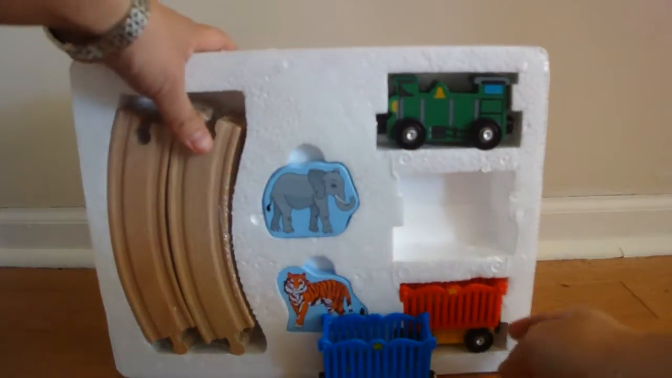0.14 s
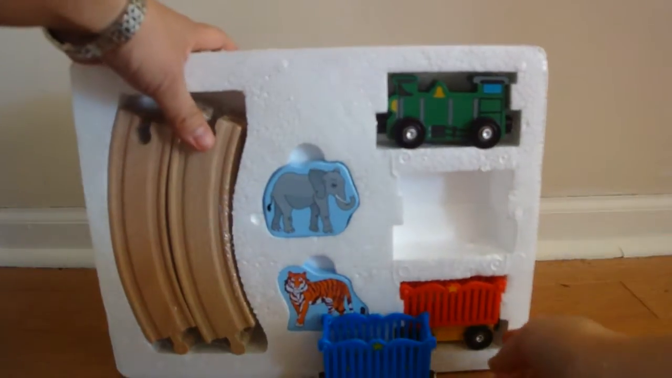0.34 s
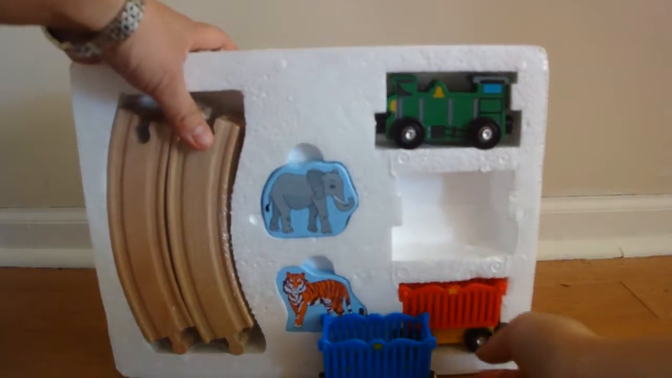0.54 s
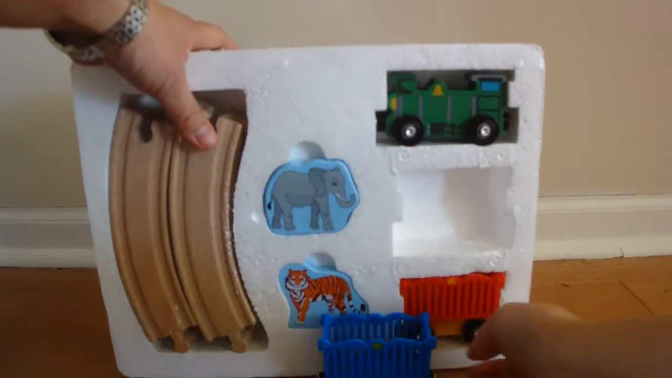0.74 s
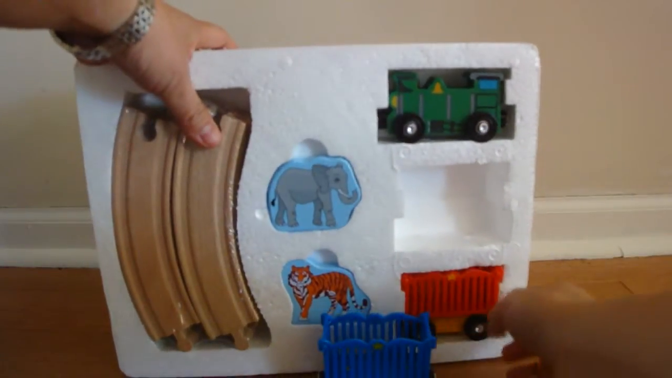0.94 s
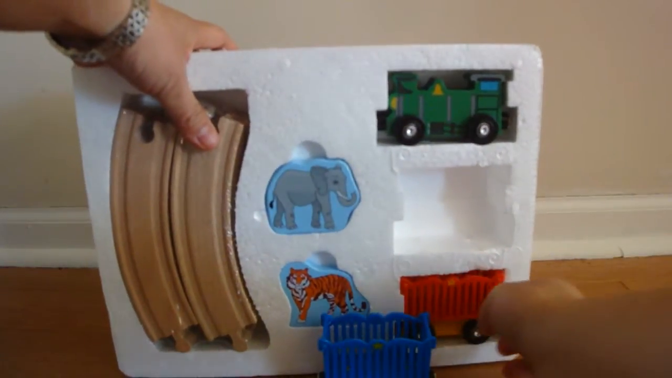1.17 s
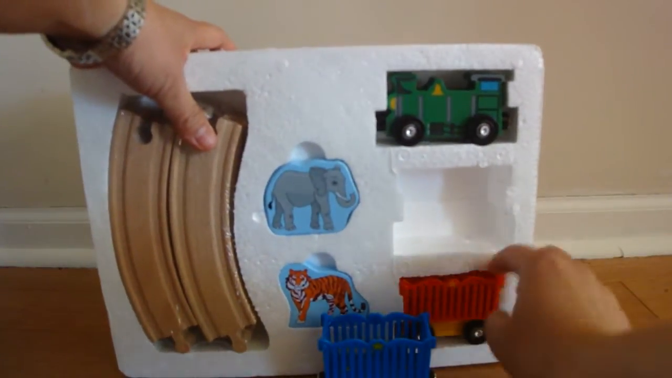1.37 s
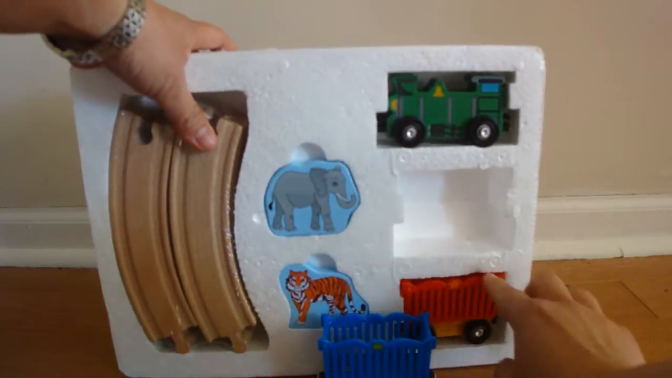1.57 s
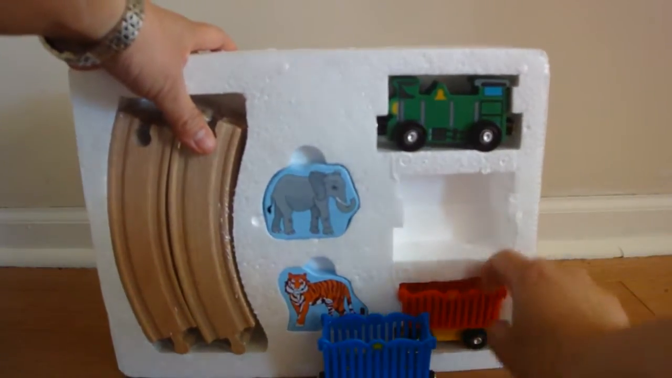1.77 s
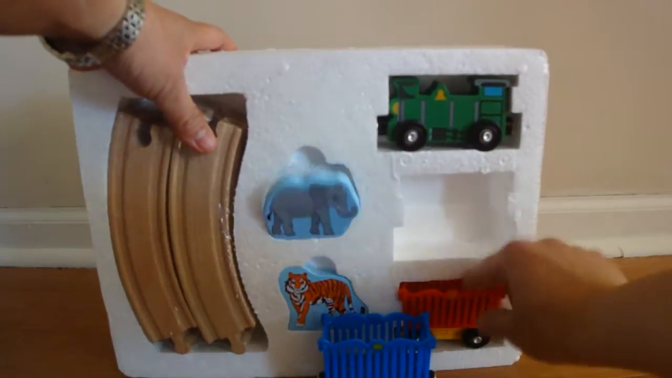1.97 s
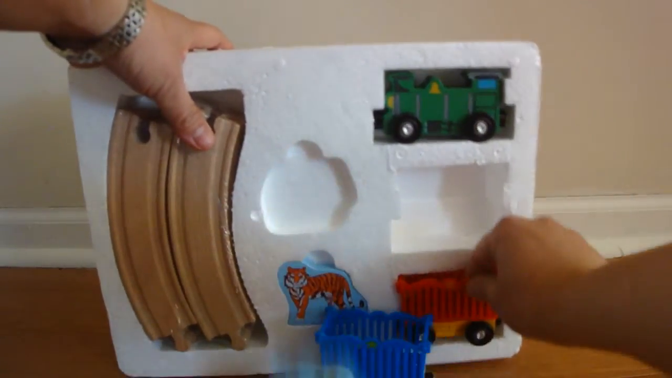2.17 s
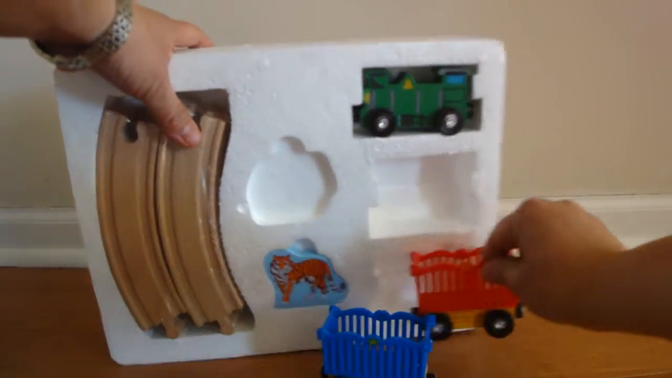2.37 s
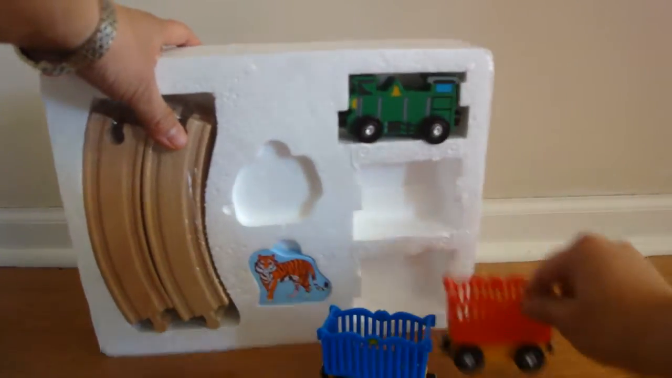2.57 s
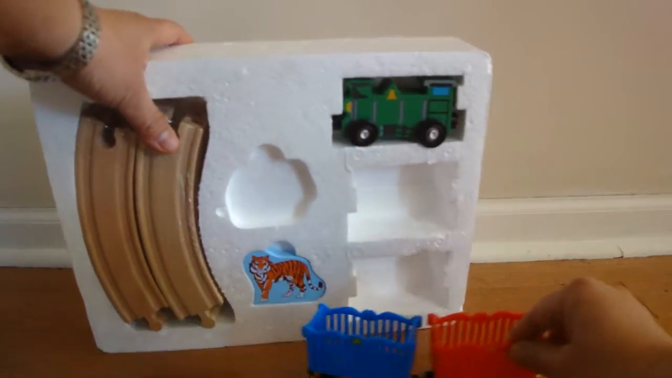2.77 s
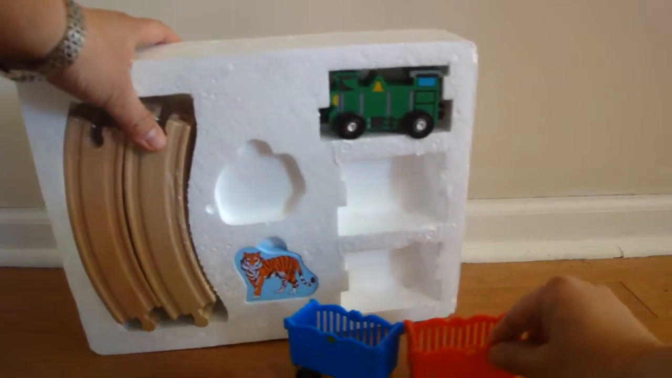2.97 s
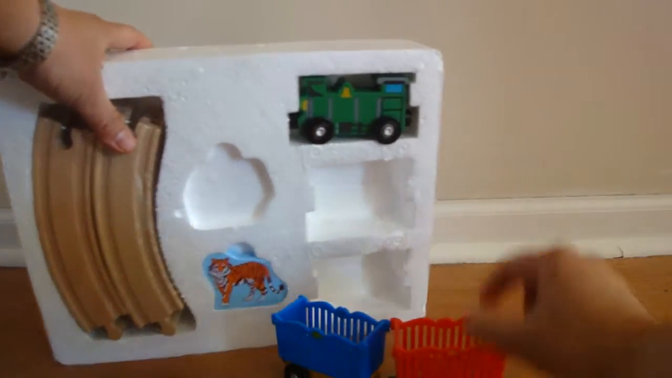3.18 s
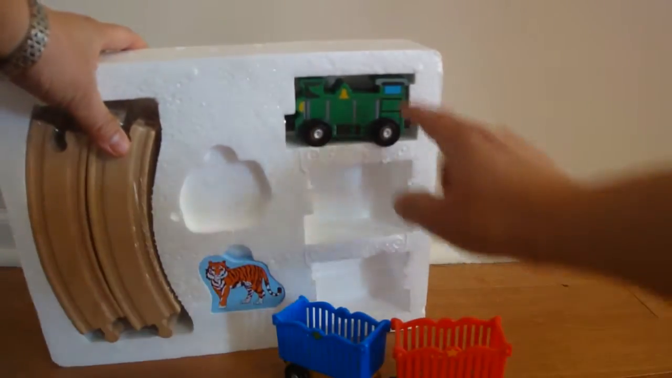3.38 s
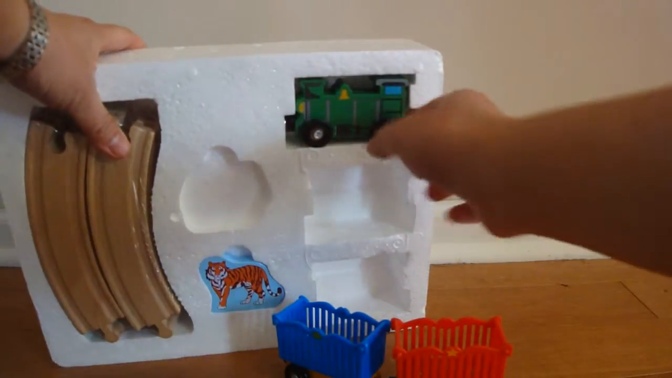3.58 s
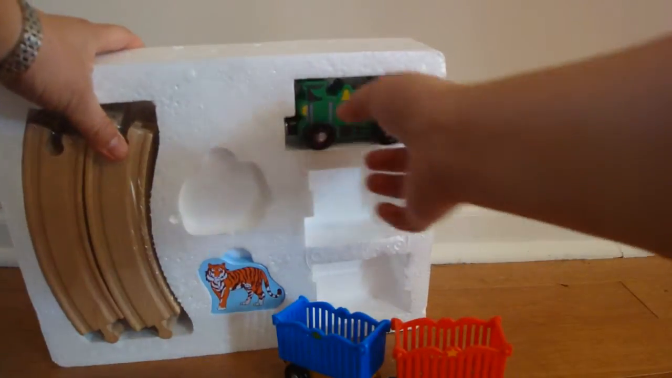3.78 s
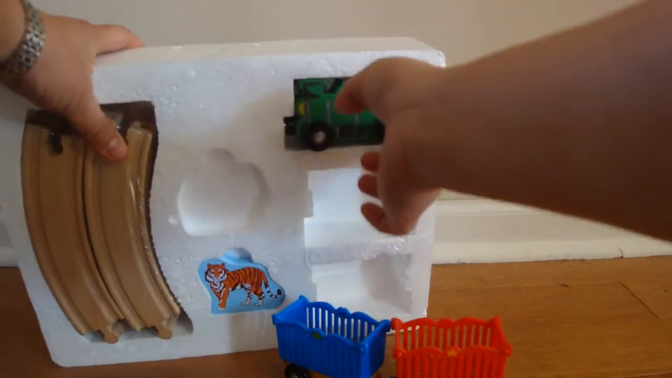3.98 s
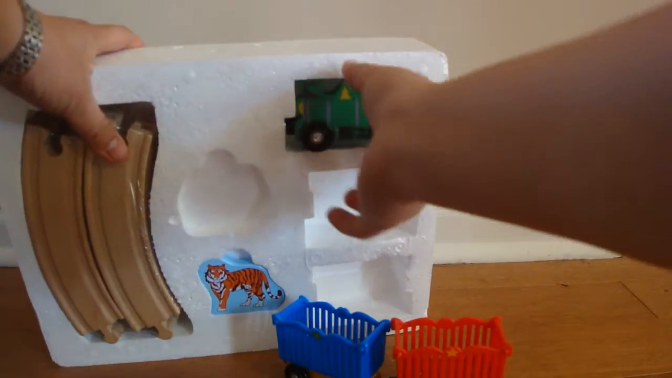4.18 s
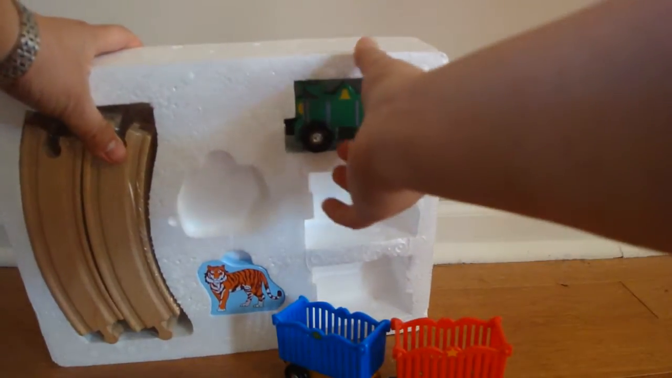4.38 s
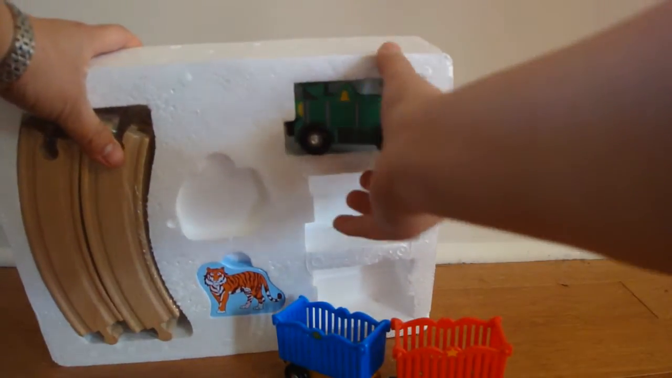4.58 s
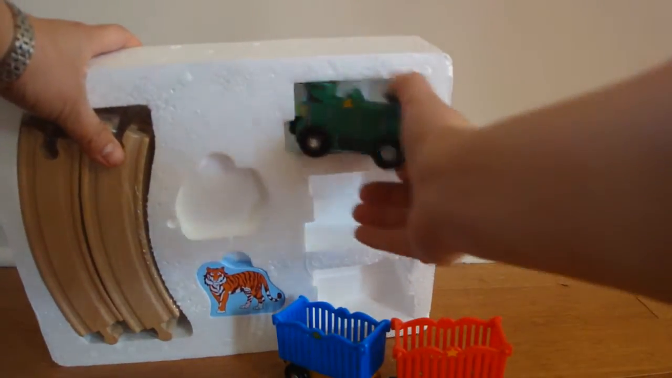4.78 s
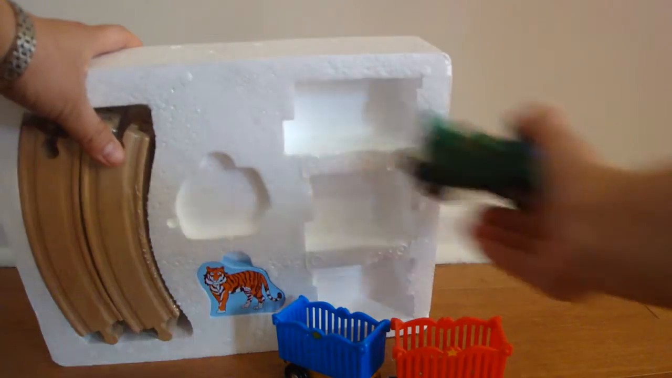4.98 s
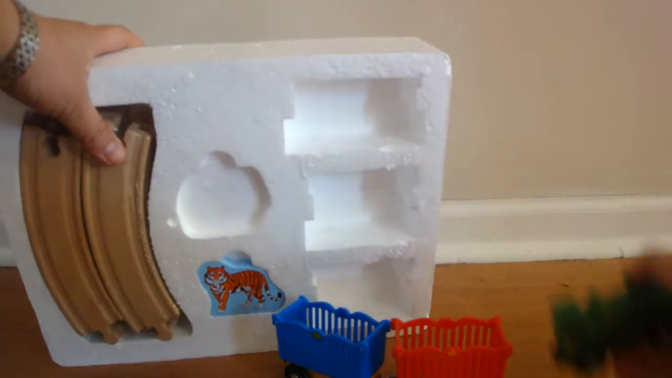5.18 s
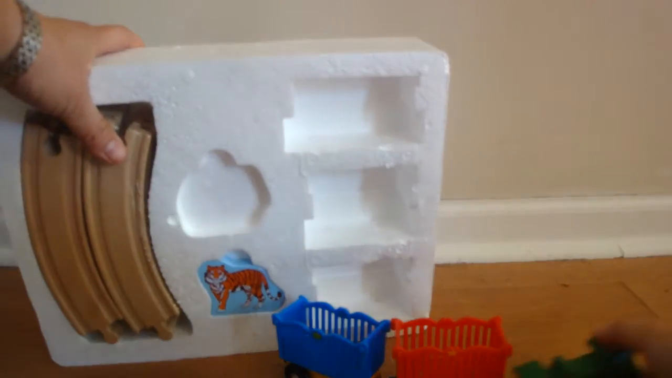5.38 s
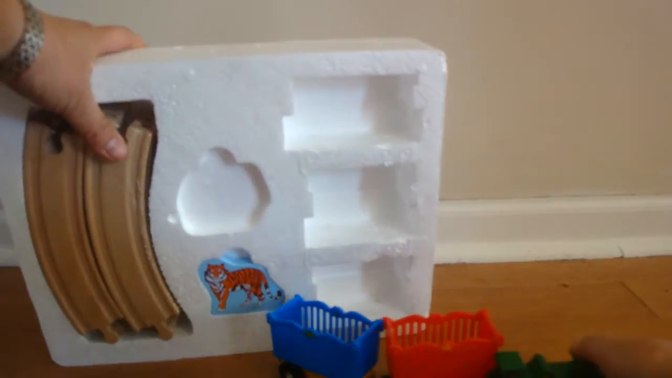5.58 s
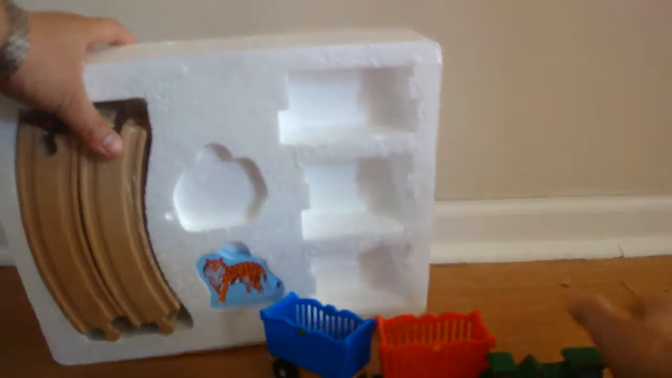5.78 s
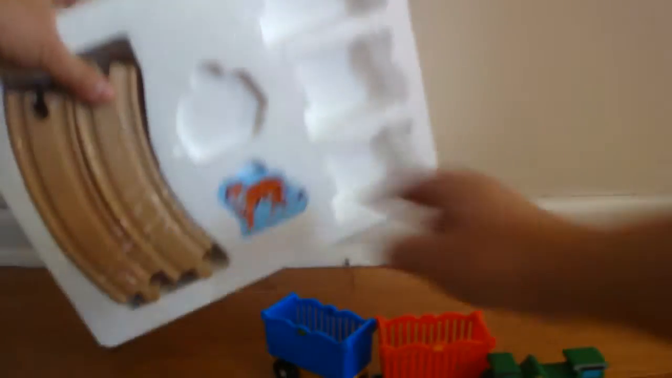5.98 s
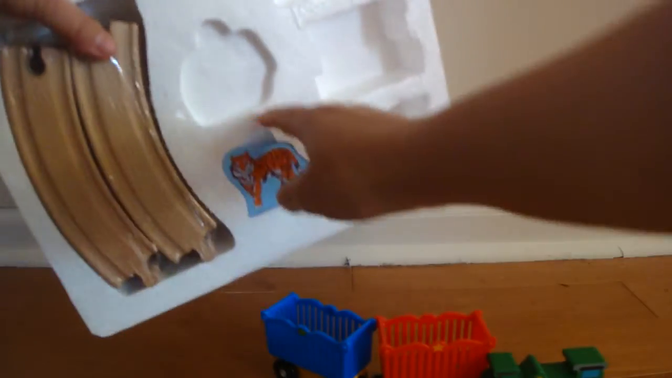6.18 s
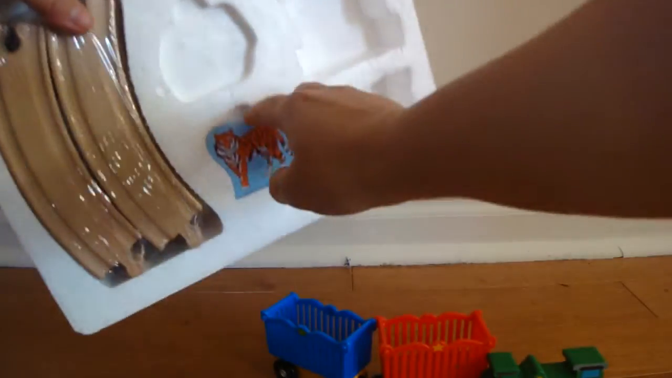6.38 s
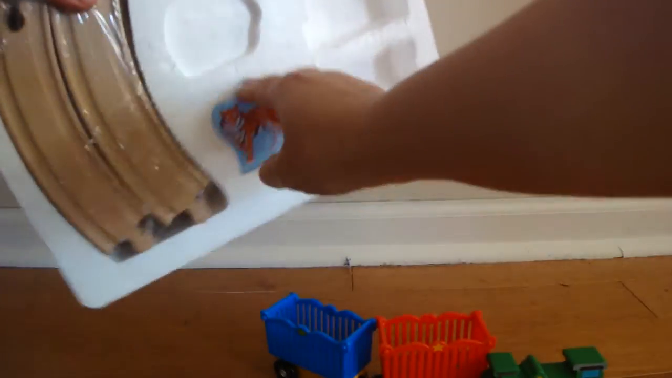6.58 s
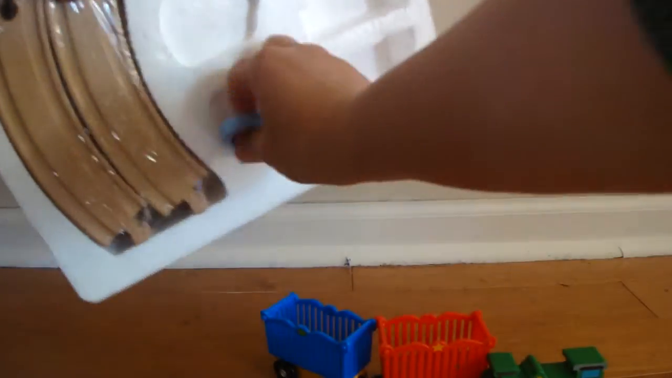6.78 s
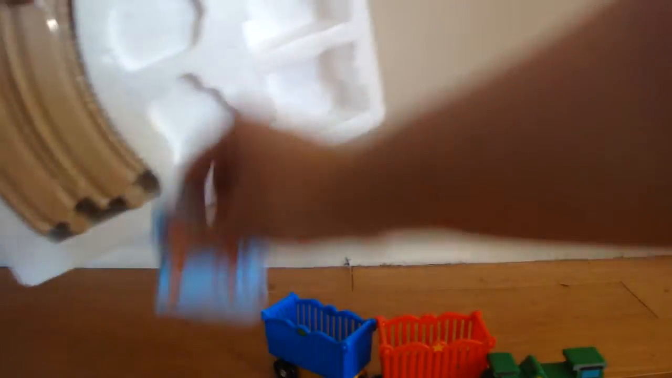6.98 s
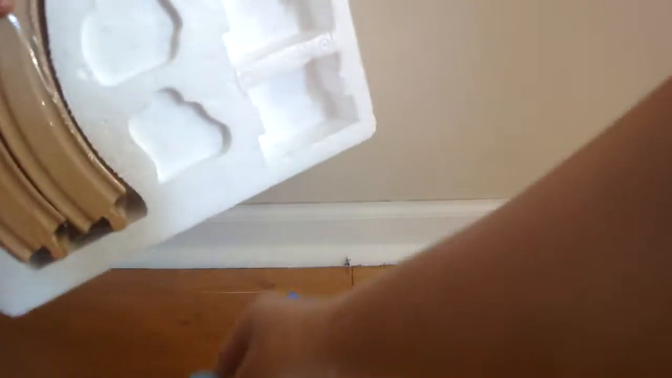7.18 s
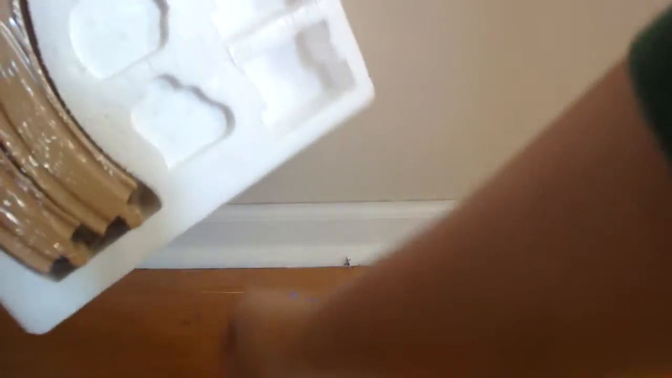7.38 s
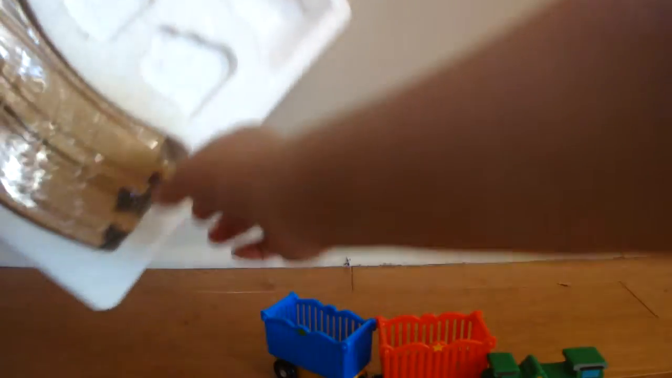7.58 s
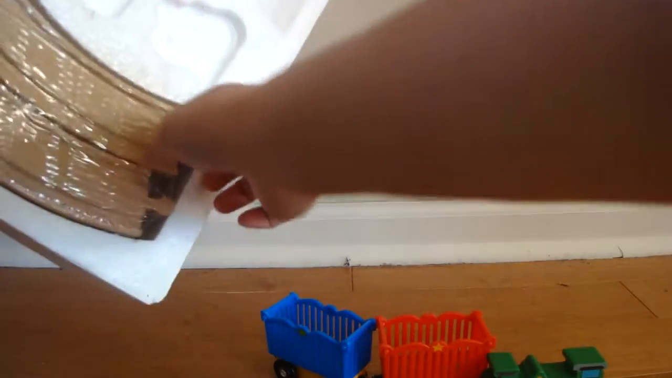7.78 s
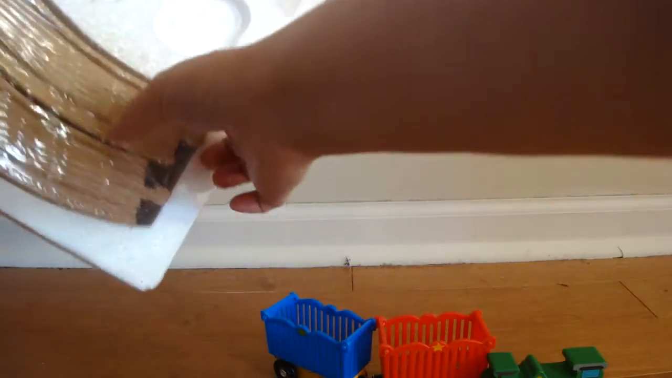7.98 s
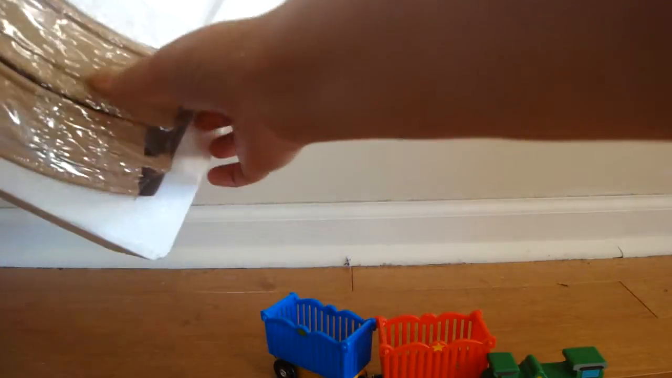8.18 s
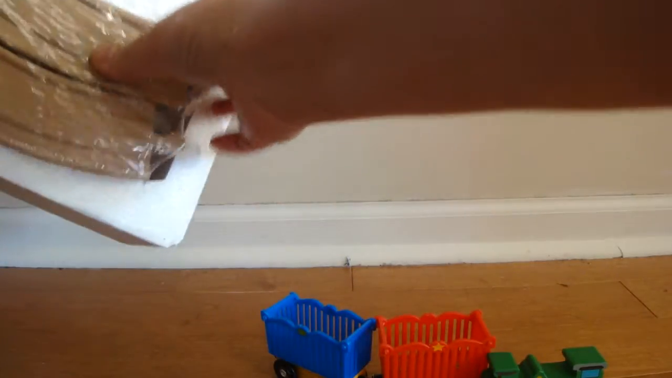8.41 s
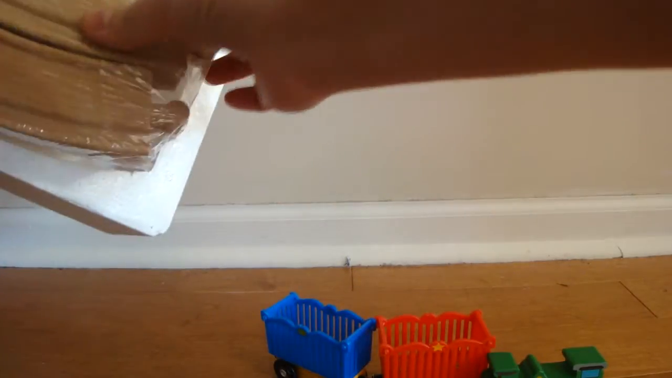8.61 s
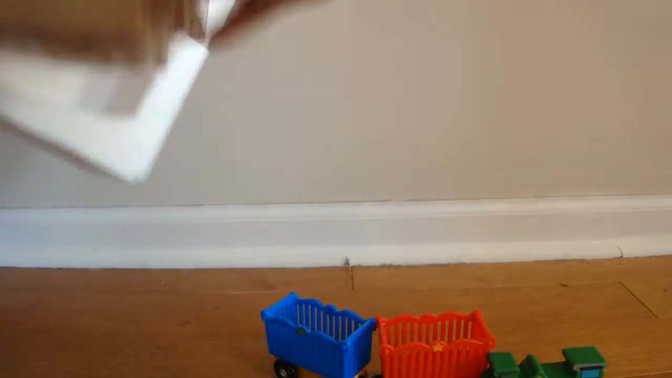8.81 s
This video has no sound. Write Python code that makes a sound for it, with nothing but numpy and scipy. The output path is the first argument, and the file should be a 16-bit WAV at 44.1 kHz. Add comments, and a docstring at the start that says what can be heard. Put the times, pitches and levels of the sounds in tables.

```python
"""Toys worked out of a foam tray

In a bare room, hands ease toy wagons and wooden animals from a foam tray close to a phone. Friction makes the
foam rasp and scuff, stick-slip makes it and a plastic wrap squeak, and fingers tap it. Impacts excite the modes
of toy and floor: a wooden animal falls and rocks to rest on the boards, an engine is set down, and a second
animal drops into a plastic wagon. The phone ducks its gain after loud blows."""
import sys
import numpy as np
from scipy import signal
from scipy.fft import rfft, irfft, next_fast_len
from scipy.io import wavfile
from scipy.ndimage import uniform_filter1d, map_coordinates

SR = 44100
rng = np.random.default_rng(int(sys.argv[2]) if len(sys.argv) > 2 else 0)


def generate_wav(sig):
    """Save sig (samples, or channels by samples) to the path in sys.argv[1] as 16-bit PCM at SR."""
    pcm = np.round(np.clip(np.atleast_2d(sig).T, -1, 1) * 32767).astype(np.int16)
    wavfile.write(sys.argv[1], SR, pcm)


N = 390285

# modes of the floor boards: (frequency [Hz], level [dB], t60 [s])
FLOOR_MODES = [(324.7, -19, 0.034), (423, -8.5, 0.041), (488.5, -0.5, 0.019), (730, -17, 0.0055)]


def amp(db):
    return 10 ** (np.asarray(db) / 20)


def unit(x):
    return x / np.sqrt(np.mean(x ** 2) + 1e-20)


def along(points, hz):
    """Interpolation of (frequency [Hz], value) points on a logarithmic frequency axis."""
    f, v = np.transpose(points)
    return np.interp(np.log(hz + 1), np.log(f + 1), v)


def filtered(x, response):
    """Linear filtering: the spectrum of x times a complex frequency response."""
    m = next_fast_len(len(x) + 8192)
    return irfft(rfft(x, m) * response(np.fft.rfftfreq(m, 1 / SR)), m)[:len(x)]


def resonance(f, hz, width):
    """Response of a damped oscillator, with gain 1 at its natural frequency."""
    return 1j * f * width / (hz * hz - f * f + 1j * f * width)


def resonate(x, bands):
    """Superposition: x drives parallel resonances of alternating polarity."""
    return filtered(x, lambda f: sum((-1) ** k * amp(db) * resonance(f, hz, width)
                                     for k, (hz, width, db) in enumerate(bands)))


def wobble(rate):
    """A smooth random curve with rate knots a second."""
    return map_coordinates(rng.standard_normal(int(N * rate / SR) + 4), [np.arange(N) * rate / SR])


def add(out, start_s, sound):
    part = out[round(start_s * SR):][:len(sound)]
    part += sound[:len(part)]


def background():
    """Noise floor: room and microphone hiss, with a faint treble tick once a mains cycle."""
    # hiss spectrum: (frequency [Hz], relative density [dB])
    spectrum = [(15, -47), (25, -9.5), (118, -9), (191, -4.5), (216, -7), (309, 0.5), (342, -6),
                (526, -2.5), (645, -4.5), (831, -5), (1280, -6.5), (2960, -12), (10800, -17), (14000, -53),
                (22000, -120)]
    mains_hz = 60
    hiss = unit(filtered(rng.standard_normal(N), lambda f: amp(along(spectrum, f))))
    gate = amp(-60 * (np.arange(N) / SR % (1 / mains_hz)) / 0.0015)
    tick = filtered(gate * rng.standard_normal(N), lambda f: resonance(f, 11300, 6000))
    return amp(-56 + 0.15 * wobble(3.8)) * (hiss + amp(-5.5) * unit(tick))


def room(x):
    """Reverberation: each frequency decays at its own rate; the tail changes as hands and tray move."""
    # reverberation time: (frequency [Hz], t60 [s])
    decay = [(200, 0.53), (1000, 0.48), (4000, 0.4), (10000, 0.32)]
    out, step = np.zeros(N), SR // 12
    x = filtered(x, lambda f: 1j * f / (1j * f + 344))  # small toys radiate little bass
    for start in range(0, N, step):
        hz, t, noise = signal.stft(rng.standard_normal(SR // 2), SR, nperseg=256)
        tail = signal.istft(noise * amp(-60 * t / along(decay, hz)[:, None]), SR, nperseg=256)[1]
        add(out, start / SR + .006, signal.fftconvolve(x[start:start + step], tail / np.linalg.norm(tail)))
    return out


def beads(slip_chance, patchy_db):
    """Micro-slip: foam beads let go as spikes on noise, with patches of random colour."""
    slips = (rng.random(N) < slip_chance) * rng.laplace(size=N)
    spectra = signal.stft(rng.standard_normal(N) + unit(slips), nperseg=384)[2]
    patches = uniform_filter1d(rng.standard_normal(spectra.shape), size=2, axis=0)
    patches = uniform_filter1d(patches, size=10, axis=1)
    return signal.istft(spectra * amp(patchy_db * unit(patches)), nperseg=384)[1][:N]


def foam_voices():
    """Source and filter: friction noise, coloured by the tray into rasp, boom and fizz of rms 1."""
    # resonances of the foam and of the tray's walls: (frequency [Hz], bandwidth [Hz], gain [dB])
    foam_bands = [(1080, 730, -1), (1820, 1270, 2), (2800, 870, 3.5), (3900, 2620, -5)]
    wall_bands = [(836, 240, -7.5), (1060, 45, 3.5), (1940, 160, -3.5), (2790, 390, -8.5), (5500, 420, -3)]
    # spectra of the low and the high friction noise: (frequency [Hz], relative density [dB])
    boom_spectrum = [(35, -59), (60, 1), (227, -10), (291, 0.5), (343, -14), (390, -2.5), (603, -6),
                     (1000, -5), (1300, -13), (2200, -120)]
    fizz_spectrum = [(2800, -26), (4200, -14), (6000, -8.5), (8000, -10.5), (11500, -12)]
    creaks_per_s, creak_db = 220, -10
    rasp = resonate(beads(.04, patchy_db=3.5), foam_bands)
    releases = (rng.random(N) < creaks_per_s / SR) * rng.standard_normal(N)
    rasp = unit(rasp) + amp(creak_db) * unit(resonate(releases, wall_bands))
    boom = filtered(beads(.01, patchy_db=3.0), lambda f: amp(along(boom_spectrum, f)))
    fizz = filtered(beads(0.3, patchy_db=4.5), lambda f: amp(along(fizz_spectrum, f)))
    return np.array([unit(rasp), unit(boom), unit(fizz)])


def rubbing(voices):
    """Sliding friction: each stroke swells and brightens, then fades, while the grip judders."""
    # strokes over the foam: (start [s], swell [s], fade [s], crest level [dB], fade depth [dB],
    # boom re rasp [dB], fizz re rasp [dB])
    strokes = [(0, 0.0017, 0.095, -34, 24, -2.5, -2.5), (0.094, 0.0068, 0.11, -50, 6.5, 6, -2),
               (0.238, 0.045, 0.058, -37, 0.5, -2, 0), (.345, 0.037, 0.16, -42.5, 12.5, 7.5, -10),
               (0.537, 0.026, 1, -37, 33.5, -5.5, -2.5), (0.574, 0.052, 0.039, -35.5, 6.5, -5.5, -2),
               (0.788, 0.018, 0.057, -48.5, 31, 11, 12), (0.902, 0.016, 0.11, -41.5, 7.5, 3.5, 0),
               (1.118, 0.011, 0.17, -46, 12, 4, -8), (1.315, 0.0081, 0.048, -40, 17.5, 6.5, -7),
               (1.369, 0.018, 0.092, -42.5, 1, -14, 5.5), (1.507, 0.069, 0.21, -38, 25, -1, -7),
               (1.713, 0.02, 0.066, -39.5, 1.5, 7.5, -3), (1.802, 0.03, 0.072, -33, 22, 1, -21),
               (1.906, 0.018, 0.049, -40, -1, -2.5, 1.5), (1.971, 0.023, 0.04, -28, 8.5, -1.5, 3.5),
               (2.039, 0.032, 0.16, -34, 6.5, 2, -3), (2.954, 0.027, 0.21, -50, 2.5, -2.5, 3),
               (3.191, 0.031, 0.078, -46, 8, 3, 4.5), (3.671, 0.038, 0.16, -37, 11, 2.5, -21.5),
               (3.84, 0.074, 0.045, -37, 7.5, -5, -11), (3.954, 0.023, 0.13, -32.5, 7.5, -1, -6.5),
               (4.12, 0.029, 0.031, -42, 4, 2.5, -10), (4.2, 0.013, 0.041, -52, 1.5, 7, -22),
               (4.256, 0.044, 0.12, -29.5, 45, -3.5, -9), (4.419, 0.0056, 0.083, -37.5, 8.5, 4.5, -12),
               (4.502, 0.038, 0.053, -41.5, 11, 2.5, -9), (4.592, 0.056, 0.07, -34.5, 28, -9.5, -11),
               (4.734, 0.015, 0.058, -50, -4, 3, -1.5), (4.81, 0.023, 0.1, -29, 23, -11, -9),
               (5.408, 0.0087, 0.097, -54, 3.5, 9, -17), (5.522, 0.029, 0.05, -51, 36, 8.5, -1),
               (5.658, 0.0091, 0.1, -46, 12, 11, -18), (5.738, 0.064, 0.1, -40.5, 28, -13, -3),
               (5.887, 0.042, 0.074, -42, 13.5, -1, 4), (6.269, 0.0083, 0.014, -35, 2, -13, 12),
               (6.29, 0.011, 0.082, -48, 18, -10, -8), (6.365, 0.03, 0.08, -47.5, -5.5, -1.5, 4.5),
               (6.485, .005, 0.067, -53, 18, 6.5, -1), (6.561, 0.032, 0.039, -36.5, 9.5, -3, -2.5),
               (6.628, 0.12, 0.12, -34, 29.5, 0, 2.5), (6.822, 0.046, 0.019, -39.5, 18, -6, 7),
               (7.69, 0.012, 0.02, -54, 5, -20, 11), (7.751, 0.02, 0.24, -40.5, 7, -6, 3.5),
               (7.965, 0.027, 0.01, -43.5, 0.3, -10, 2), (7.995, 0.023, 0.13, -30, -1, -13.5, 3.5),
               (8.145, 0.013, 0.095, -38, -2.5, -5.5, -1.5), (8.253, 0.011, 0.069, -32, 8, -18, 4),
               (8.335, 0.059, 0.065, -41, 5, -17, 8), (8.439, 0.071, 0.026, -33, 12, -6.5, 6.5),
               (8.554, 0.016, 0.071, -43, 1.5, -30, 11.5), (8.642, 0.014, 0.049, -33, 2.5, -14, 2),
               (8.688, 0.024, 0.14, -50, -10, -20, 13)]
    swell_db_per_s, ramp_s = 138, .008
    out = np.zeros(N)
    for start, swell, fade, db, fade_db, boom_db, fizz_db in strokes:
        crest, end = start + swell, start + swell + fade
        at = np.arange(round(start * SR), min(round((end + ramp_s) * SR), N))
        t = at / SR
        swing_db = np.interp(t, [start, crest, end], [-swell_db_per_s * swell, 0, -fade_db])
        contact = np.clip(np.minimum((t - start) / ramp_s, 1 + (end - t) / ramp_s), 0, 1)
        voice_db = [swing_db, boom_db + 0.78 * swing_db, fizz_db + 1.26 * swing_db]
        out[at] += contact * amp(db) * np.sum(amp(voice_db) * voices[:, at], axis=0)
    judder_db = 1.3 * wobble(35) + 0.46 * wobble(90)
    return amp(judder_db) * out


def scuffs(voices):
    """Transient friction: a quick slip swells and dies; its contact patch adds a broad resonance."""
    # slips of a toy on the foam: (time [s], level [dB], patch frequency [Hz], boom [dB], fizz [dB],
    # duration [s])
    slips = [(0.297, -26, 2160, -11, 2, 0.049), (0.3777, -14.5, 2050, -30, -3.5, 0.067),
             (0.985, -22, 1760, 0, -5, 0.033), (1.078, -18, 1640, -7, -9, 0.086),
             (1.098, -10.5, 1680, -20, -4, 0.039), (1.526, -20, 1200, -22, -10, 0.05),
             (1.54, -9.5, 1510, -33, -2.5, 0.05), (1.732, -16.5, 1080, 3, -7, 0.037),
             (2.062, -16.5, 1820, -21, -26, 0.049), (2.154, -11.5, 1410, 1.5, -10, 0.04),
             (2.282, -9.5, 2360, -6.5, -4.5, 0.097), (3.199, -45, 1140, 13, -4, 0.026),
             (3.266, -34.5, 910, 6, -17, 0.053), (3.7, -21.5, 1880, -22, -10, 0.17),
             (3.761, -20.5, 1930, -33, -4, 0.1), (3.968, -21, 2720, -8, 4, 0.052),
             (4.258, -31, 2650, -7, -9, 0.09), (4.813, -24, 1810, -2.5, -9, 0.13),
             (4.886, -37, 620, 11, -30, 0.077), (5.75, -25, 960, 0.5, -25, 0.087),
             (6.208, -42, 1110, 7.5, -6, 0.048), (6.5818, -16, 2200, -4.5, -1.5, 0.013),
             (7.758, -34, 954, 10, 9.5, 0.027), (8.705, -28, 3170, -26, 18, 0.02)]
    rise_share = 0.24
    out, t = np.zeros(N), np.arange(SR // 8) / SR
    for start, db, hz, boom_db, fizz_db, length in slips:
        rise, fall = rise_share * length, (1 - rise_share) * length
        rasp, boom, fizz = voices[:, rng.integers(N - SR):][:, :len(t)]
        swell = np.where(t < rise, np.sin(np.pi / 2 * t / rise), amp(-60 * ((t - rise) / fall) ** 2))
        patch = rasp + 0.7 * unit(filtered(rasp, lambda f: resonance(f, hz, .5 * hz)))
        friction = unit(patch) + amp(boom_db + 1.5) * unit(boom) + amp(fizz_db + 0.5) * unit(fizz)
        add(out, start, amp(db - 10.0) * swell * friction)
    return out


def squeaks():
    """Stick-slip oscillation: a gliding, broken tone with overtones, less regular at fast slip rates."""
    # squeaks of the foam, and from 8 s on of plastic wrap sliding: (time [s], duration [s], first slip rate
    # [Hz], last slip rate [Hz], level [dB])
    glides = [(5.808, 0.0063, 1840, 1800, -25.5), (0.822, 0.028, 396, 450, -27.5),
              (2.16, 0.01, 904, 2700, -13), (0.811, 0.019, 1184, 1042, -23), (5.756, 0.019, 950, 1000, -27),
              (5.772, 0.014, 1000, 1020, -26.5), (5.78, 0.022, 1500, 2800, -34),
              (3.966, 0.02, 6150, 5600, -25), (3.268, 0.034, 900, 760, -34), (3.203, 0.018, 422, 400, -37),
              (3.7, 0.045, 5800, 6500, -39), (3.753, 0.04, 5750, 5800, -33),
              (6.365, 0.07, 2300, 2300, -40.5), (6.429, 0.058, 2280, 2440, -35),
              (6.37, 0.046, 2850, 2900, -34), (8.065, 0.036, 4770, 4900, -30.5),
              (8.115, 0.04, 3080, 3000, -29), (8.282, 0.035, 5500, 12000, -29.5),
              (8.327, 0.032, 6300, 5900, -35), (8.374, 0.019, 10830, 6200, -28),
              (8.394, 0.022, 6630, 12200, -26.5), (8.458, 0.072, 2000, 3450, -28.5),
              (8.496, 0.053, 6630, 14000, -25), (8.561, 0.045, 10800, 1000, -28),
              (8.655, 0.046, 2603, 2460, -30), (8.695, 0.02, 1020, 7900, -21.5),
              (8.708, 0.059, 8060, 11700, -24.5), (8.756, 0.045, 10830, 5950, -22.5),
              (8.76, 0.019, 6900, 7160, -35), (8.802, 0.025, 5020, 4710, -20.5),
              (8.818, 0.027, 5800, 10000, -31), (8.305, 0.012, 8300, 7500, -30),
              (7.5, 0.013, 9300, 12000, -31), (8.413, 0.01, 4500, 4500, -33), (8.65, 0.02, 850, 790, -29.5),
              (1.467, 0.01, 2300, 2130, -34)]
    out = np.zeros(N)
    for start, length, from_hz, to_hz, db in glides:
        progress = np.arange(round(length * SR)) / (length * SR)
        drift, grip = uniform_filter1d(rng.standard_normal((2, len(progress))), size=40)
        jitter = uniform_filter1d(rng.standard_normal(len(progress)), size=9)
        slip_hz = from_hz + (to_hz - from_hz) * progress
        roughness = (slip_hz / 7100) ** 0.31 * (0.5 * drift + 0.19 * jitter)
        phase = 2 * np.pi * np.cumsum(slip_hz * (1 + roughness)) / SR
        tones = sum(0.31 ** k * (k * slip_hz < SR / 2) * np.sin(k * phase) for k in range(1, 4))
        add(out, start, amp(db + 7.5 + 21.0 * grip) * np.sin(np.pi * progress) ** .5 * tones)
    return out


def ring(modes, t):
    """Free vibration: damped modes, excited at new strengths by each blow."""
    scatter_db = rng.normal(0, 3, len(modes))
    return sum(amp(db + scatter - 60 * t / t60) * np.sin(2 * np.pi * hz * t)
               for (hz, db, t60), scatter in zip(modes, scatter_db))


def impacts(hits, body, support, gain_db, rattle_db, crack_db, ring_db, cycles, contact_s=6e-5, held_s=0):
    """Impact excitation: the contact clicks, cracks and rattles; the body and its support ring on."""
    out, t = np.zeros(N), np.arange(SR // 10) / SR
    edge = filtered(1.0 * (t == 0), lambda f: resonance(f, 7200, 5200))
    press = 1 - np.exp(-t / contact_s)  # a soft contact loads the surface gradually
    mean_db = np.mean([hit[1] for hit in hits])
    for start, db, hz, thud_db, sharp_db in hits:
        click = amp(-60 * t * hz / cycles) * np.sin(2 * np.pi * hz * t)
        rattle = filtered(rng.standard_normal(len(t)), lambda f: resonance(f, 970, 1830))
        rattle *= amp(rattle_db - 60 * t / 0.024)
        burst = amp(-60 * t / .006) * rng.standard_normal(len(t))
        crack = 8.7 * edge + filtered(burst, lambda f: resonance(f, 5100, 12000))
        crack *= amp(crack_db + 0.094 * (db - mean_db) + sharp_db)  # harder blows crack more
        thud = amp(thud_db + 6.0) * (1 - np.exp(-t / 0.0038)) * ring(support, t)
        ringing = amp(ring_db - 18 * (start < held_s)) * ring(body, t)  # fingers mute it until held_s
        add(out, start, amp(db + gain_db) * (press * (click + rattle + ringing) + crack + thud))
    return out


def handling():
    """Soft impacts: fingers tap and toys tick in the hand, exciting the tray and its hollows."""
    # fingers on the tray: (time [s], level [dB], click frequency [Hz], thud [dB])
    finger_taps = [(0.104, -25, 1120, -18), (.15, -31, 790, -17), (.197, -31, 900, -17),
                   (.482, -28, 900, -8), (.366, -23, 850, -7), (.635, -15.5, 900, -6),
                   (0.4629, -21.5, 1800, -8.5), (0.524, -20, 1540, -24), (0.8146, -12.5, 1080, -12),
                   (0.8465, -24, 500, -2), (0.8532, -18.5, 1110, -4), (1.0209, -31.5, 1236, 13),
                   (1.066, -15, 1460, -15), (1.1774, -30, 893, 2), (1.6171, -16, 780, -34),
                   (1.717, -21.5, 1010, -5), (1.7692, -19, 1100, -4), (2.117, -15, 940, -33),
                   (3.203, -33, 696, 6), (3.291, -32, 2000, -15), (3.699, -15, 1890, -27),
                   (3.711, -15.5, 1100, -10), (3.739, -21, 776, -19), (4.2832, -10, 2780, -38),
                   (4.4254, -18.5, 1020, -44), (6.7449, -15.5, 1830, -7), (6.7705, -35.5, 880, 18.5),
                   (6.953, -38.5, 890, -24), (7.185, -15.5, 1060, -42), (7.7834, -11.5, 920, -12.5),
                   (8.1995, -13.5, 2960, -19), (8.031, -12.5, 1230, -21), (8.258, -23, 1350, -29),
                   (8.5128, -15.5, 950, -14), (8.649, -16, 827, -33)]
    # small bright ticks of toys: (time [s], level [dB], click frequency [Hz])
    toy_ticks = [(3.46, -33, 1240), (5.047, -32, 2000), (5.0794, -32, 2022), (5.097, -33, 2000),
                 (5.141, -37, 3040), (5.148, -32, 3480), (5.18, -37, 1990), (6.0853, -39, 4660)]
    # modes of the tray and of its empty pockets: (frequency [Hz], level [dB], t60 [s])
    tray_modes = [(1080, -25, 0.035), (1710, -5, 0.0083)]
    pocket_modes = [(316, -3.5, 0.026), (443, 3, 0.015)]
    tick_thud_db = -31
    taps = impacts([(*tap, 0) for tap in finger_taps], tray_modes, pocket_modes,
                   gain_db=4.5, rattle_db=-3.5, crack_db=-22.5, ring_db=-5.5, cycles=12.4, contact_s=0.0019)
    ticks = impacts([(*tick, tick_thud_db, 0) for tick in toy_ticks], tray_modes, pocket_modes,
                    gain_db=3.5, rattle_db=-7, crack_db=-6.5, ring_db=-25, cycles=9.5, contact_s=0.0011)
    return taps + ticks


def engine_set_down():
    """Hard impacts: a toy engine's wheels touch down and ring together with the boards."""
    # wheel contacts: (time [s], level [dB], click frequency [Hz], thud [dB], crack [dB])
    contacts = [(5.3788, -34, 2600, -28, -4), (5.3842, -25.5, 2900, -17, 0),
                (5.4055, -25.5, 2900, -10.5, -4), (5.4271, -38, 1400, 1, 0), (5.4691, -33.5, 1030, 0.5, 0),
                (5.525, -35, 2830, -15, 5), (5.5498, -29, 2800, -7, -1), (5.612, -38, 1100, -20, -8),
                (5.6196, -4.5, 3170, -29, -12), (5.6224, -2, 4200, -12, -3), (5.8675, -25, 2700, -20, 2),
                (5.8696, -16, 2700, -33, 12), (5.872, -19.5, 1040, -7, -1)]
    # modes of the wheels: (frequency [Hz], level [dB], t60 [s])
    wheel_modes = [(820, -15, 0.037), (2700, -10, 0.031), (3900, -6.5, 0.014), (4160, -17, 0.018),
                   (4600, -18, 0.01)]
    return impacts(contacts, wheel_modes, FLOOR_MODES,
                   gain_db=7.0, rattle_db=-6.5, crack_db=-23, ring_db=-13.0, cycles=7.6)


def animal_in_wagon():
    """Rebound and damping: an animal bounces in a plastic wagon, muted until the fingers let go."""
    # bounces: (time [s], level [dB], click frequency [Hz], thud [dB], crack [dB])
    bounces = [(7.2982, 1, 960, -8.5, 5), (7.2997, 4.5, 3430, -42, -4), (7.3859, -6.5, 740, -14, -22),
               (7.4216, 13, 3800, -15.5, 6.5), (7.5211, -1.5, 833.6, -24, -13),
               (7.5212, 0.5, 3480, -32, -13), (7.5262, 7.5, 3250, -12, 1), (7.5562, -5, 3240, -20, -5),
               (7.5787, 6.5, 3530, -34, 3), (7.589, 2, 2800, -23, -6), (7.6165, 5.5, 3900, -15.5, 6)]
    # modes of the wagon: (frequency [Hz], level [dB], t60 [s])
    wagon_modes = [(786, -32, 0.018), (2830, -11, .03), (4300, -7.5, 0.076), (4300, -9, .08),
                   (7520, -2, .008), (9700, -4, .008)]
    return impacts(bounces, wagon_modes, FLOOR_MODES,
                   gain_db=-2.5, rattle_db=-6.0, crack_db=-22.0, ring_db=-18.5, cycles=8.1, held_s=7.524)


def falling_animal():
    """Repeated impact: a wooden animal falls and rocks to rest, exciting its own modes and the floor's."""
    # blows on the boards: (time [s], level [dB], click frequency [Hz], thud [dB], crack [dB])
    blows = [(2.1748, -1, 880, -6, -1), (2.1983, -14, 900, -29, 0), (2.2035, -12, 700, 9, 0),
             (2.2153, -6, 890, -6, 1), (2.2225, 4, 850, -16, -7), (2.2375, -0.5, 2000, -22, 2),
             (2.2513, 7, 2280, -30, -4), (2.3163, 4, 1700, -9.5, -10), (2.3532, -5, 1880, -5, -3),
             (2.389, -3, 1700, -4.5, -9), (2.4141, -8, 1860, -30, -4), (2.4272, 5, 3040, -31, 5),
             (2.4551, -4.5, 2900, -7, -1), (2.4703, -9.5, 1140, -25, -6), (2.4932, -3.5, 2790, -6, -1),
             (2.513, -18, 1500, -17, -4), (2.5225, -15, 1400, -18, -7), (2.5384, -0.5, 1960, -28, 1),
             (2.5593, -0.5, 3120, -16.5, -7), (2.5805, -5.5, 3120, -16, 1), (2.6285, 3.5, 2880, -17, 7),
             (2.6521, 3.5, 3050, -17, 2), (2.6707, 4, 3470, -28, -5), (2.6895, -8, 2900, -14, 3),
             (2.706, 3.5, 3060, -26, 11), (2.7205, 2, 3900, -17, -5), (2.7368, -2, 3080, -16, 12),
             (2.7472, -7, 2620, -19, 2), (2.7523, -3.5, 3100, -23, -5), (2.779, -10.5, 1850, -25, 0),
             (2.7855, -6.5, 1820, -12, -3)]
    # modes of the wooden animal: (frequency [Hz], level [dB], t60 [s])
    wood_modes = [(1060, -19, 0.05), (1760, -30, 0.039), (4710, -20.5, 0.052), (5540, -22, 0.03),
                  (8500, -21, 0.013)]
    return impacts(blows, wood_modes, FLOOR_MODES,
                   gain_db=3.0, rattle_db=-6.0, crack_db=-29, ring_db=-10.5, cycles=7.2)


def scene():
    """Superposition: direct and reverberant sound pass the microphone port and join the noise floor."""
    voices = foam_voices()
    strokes = rubbing(voices)
    touches = scuffs(voices) + squeaks() + handling()
    blows = falling_animal() + engine_set_down() + animal_in_wagon()
    # directivity: the treble of the blows beams at the phone, so the room gets less of it
    off_axis = filtered(blows, lambda f: 1 / (1 + 1j * f / 8400) ** 2)
    reverb = room(amp(-10.0) * strokes + amp(-10.5) * touches + amp(-6.5) * off_axis)
    port = lambda f: (1j * f / (1j * f + 190)) ** 4 + amp(-35.5)  # a small port passes little bass
    return (filtered(strokes + touches + blows + reverb, port) + background())[None]


def soft_clip(x, ceiling, hardness):
    """Saturation: peaks flatten as they near the ceiling."""
    return x / (1 + np.abs(x / ceiling) ** hardness) ** (1 / hardness)


def record(dry):
    """Automatic gain control: peaks duck the gain, which climbs back; clipping and band limits follow."""
    threshold_db, duck_share, recovery_db_per_s = -7, 0.81, 110
    bass_hz, top_hz, final_top_hz = 97, 10955, 16600
    need_db = np.minimum(0, threshold_db - 20 * np.log10(np.abs(dry[0]) + 1e-9))
    climb_db = recovery_db_per_s * np.arange(N) / SR
    gain_db = np.minimum.accumulate(duck_share * need_db - climb_db) + climb_db
    late_db = uniform_filter1d(np.minimum(gain_db, 0), size=81, origin=40)  # the gain reacts a moment late
    x = soft_clip(dry[0] * amp(late_db), ceiling=0.66, hardness=7.3)
    high_band = lambda f: amp(-26) * np.exp(-((f - 13200) / 250) ** 2)  # a faint narrow band of sound near 13.2 kHz
    x = filtered(x, lambda f: np.maximum(np.clip(.5 + (top_hz - f) / 160, 0, 1), high_band(f)))
    x = soft_clip(x, ceiling=.8, hardness=14)
    coupling = lambda f: (.5 * bass_hz + 1j * f) / (bass_hz + 1j * f)  # the amplifier thins the bass
    return filtered(x, lambda f: np.clip((final_top_hz - f) / 600, 0, 1) * coupling(f))[None]


dry = scene()
out = record(dry)
generate_wav(out)
```